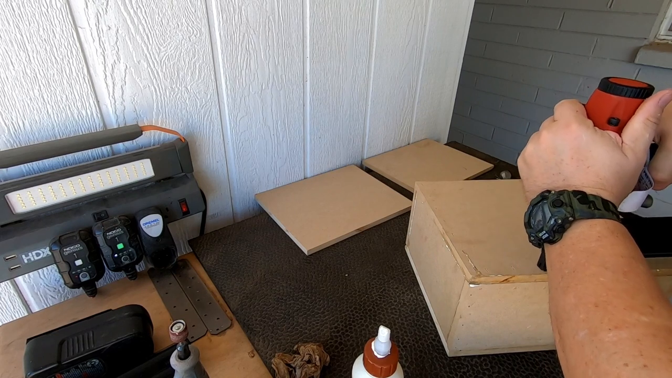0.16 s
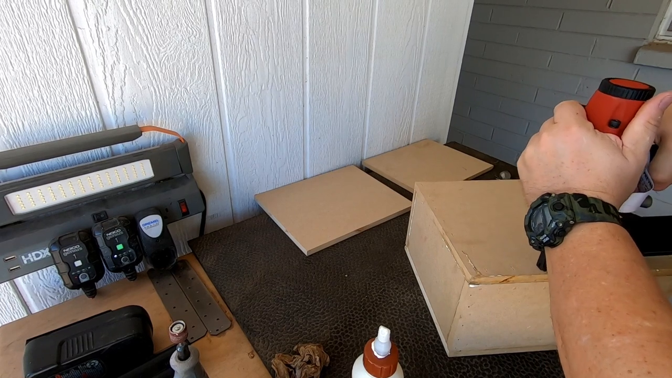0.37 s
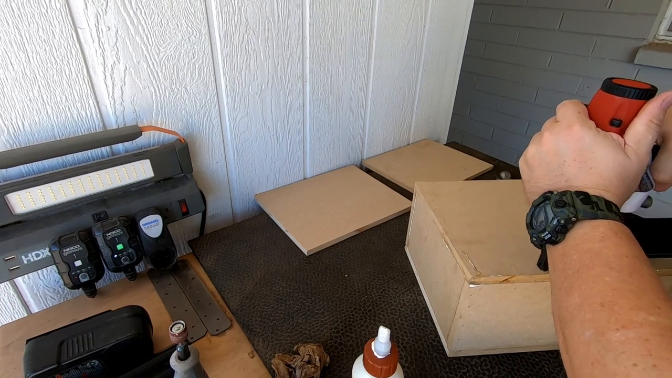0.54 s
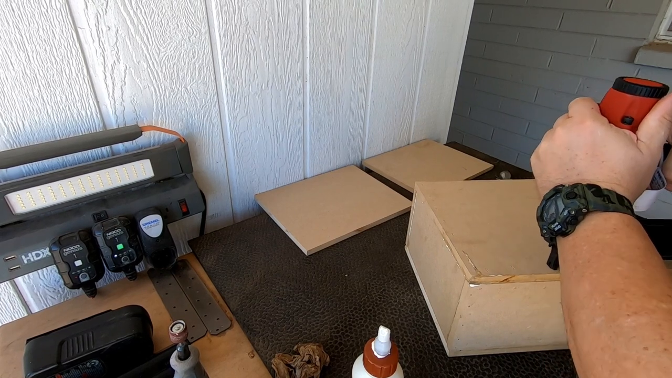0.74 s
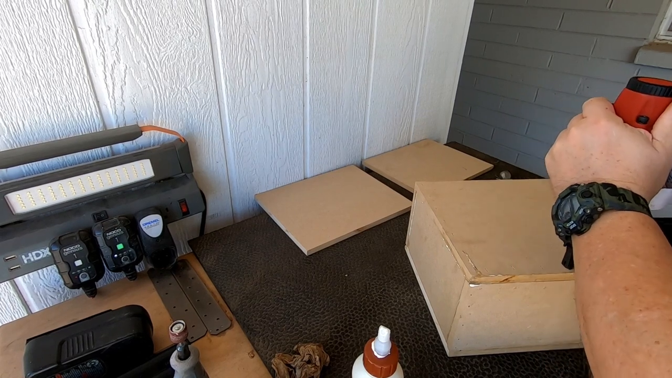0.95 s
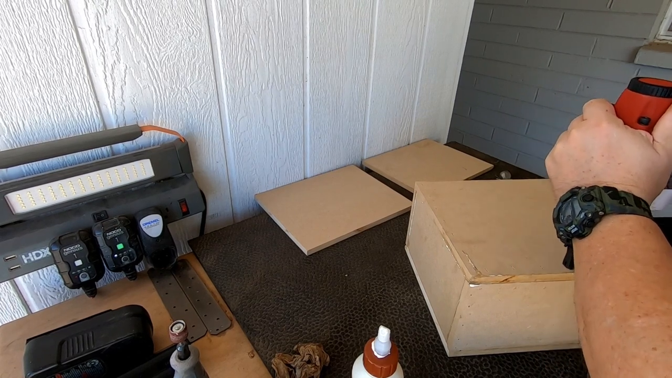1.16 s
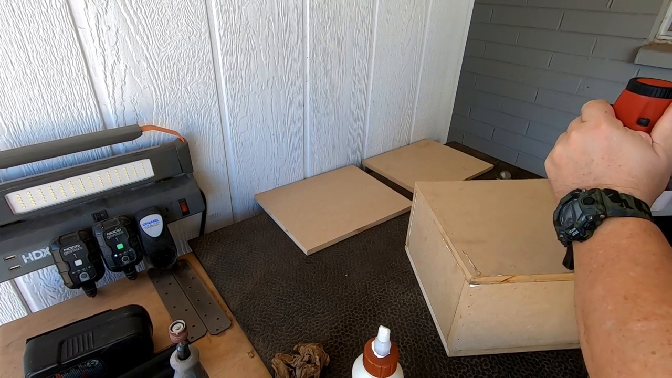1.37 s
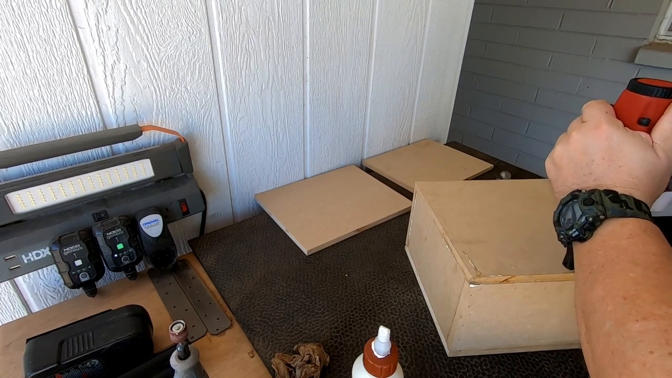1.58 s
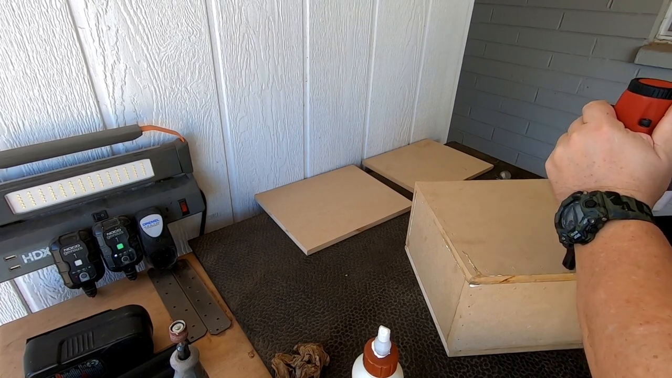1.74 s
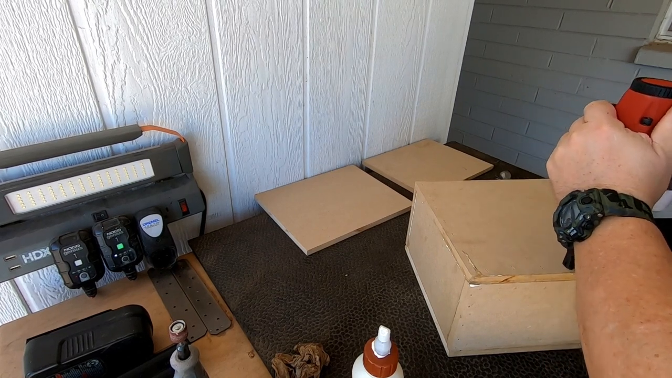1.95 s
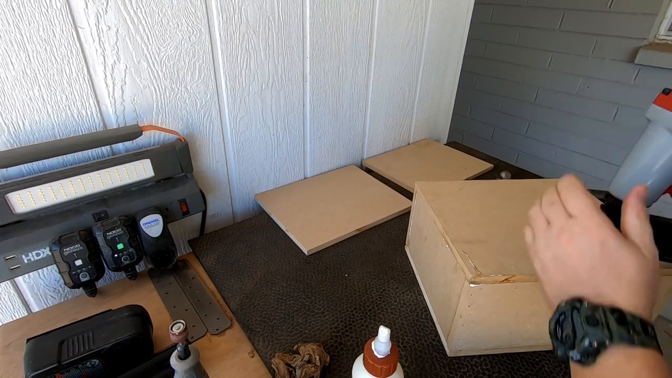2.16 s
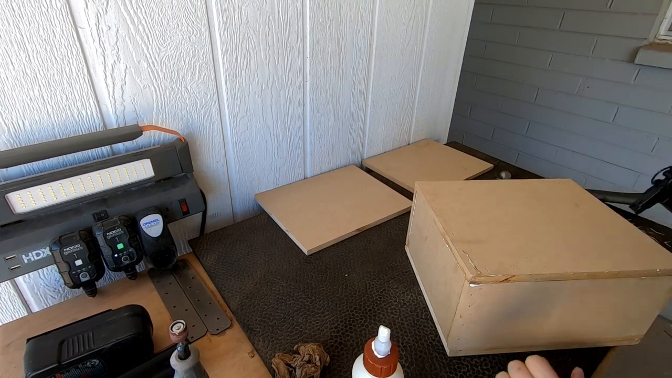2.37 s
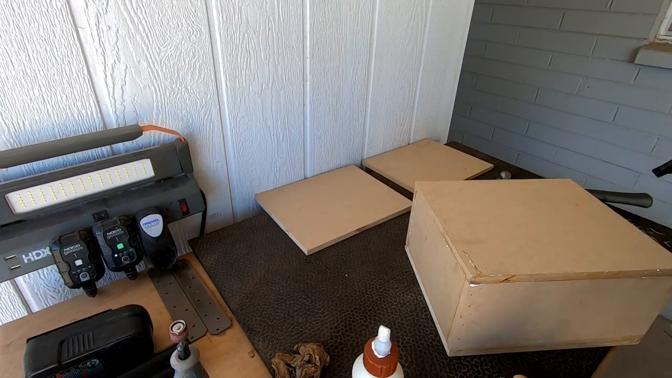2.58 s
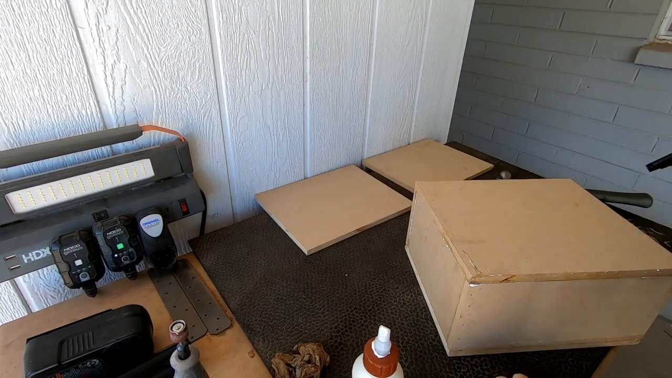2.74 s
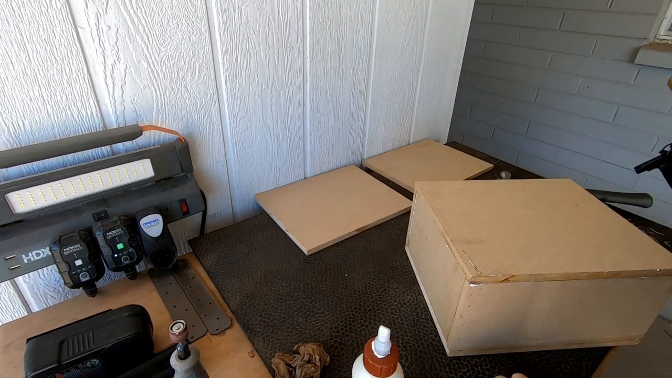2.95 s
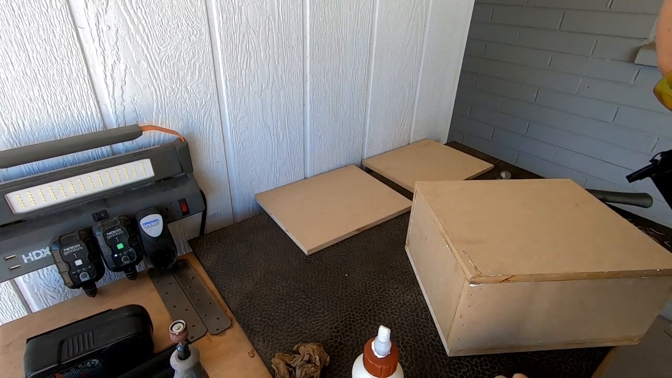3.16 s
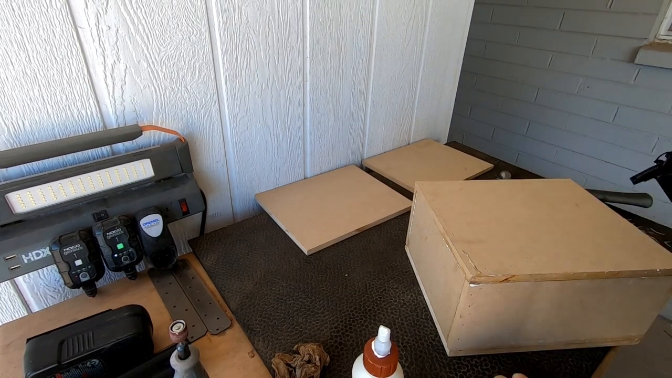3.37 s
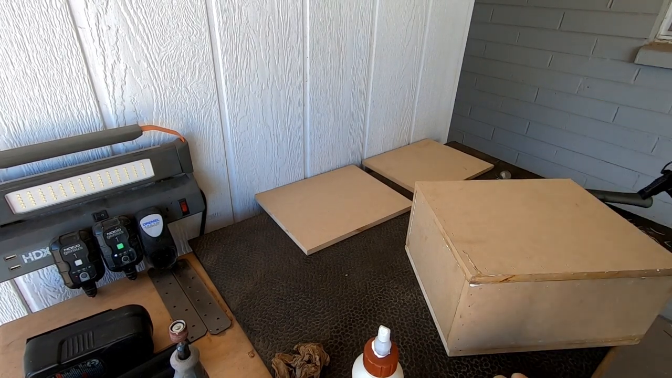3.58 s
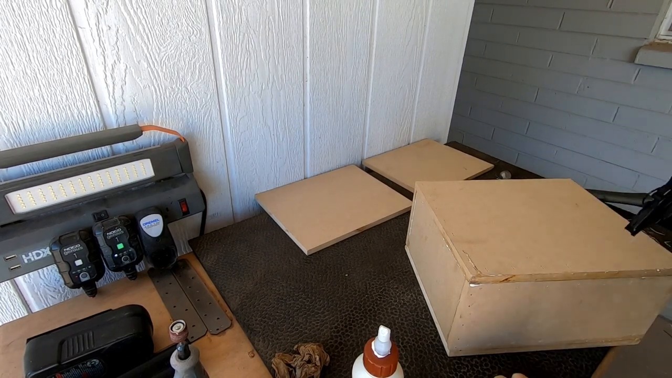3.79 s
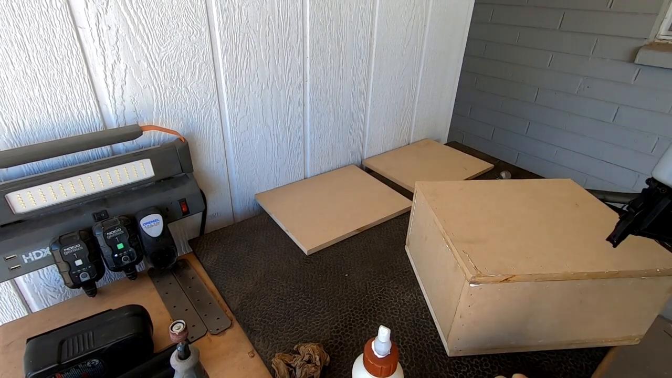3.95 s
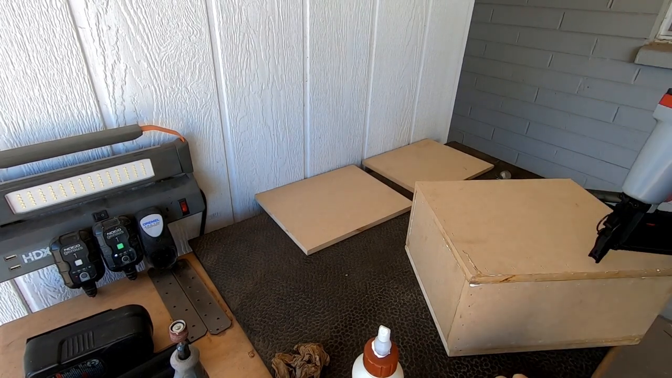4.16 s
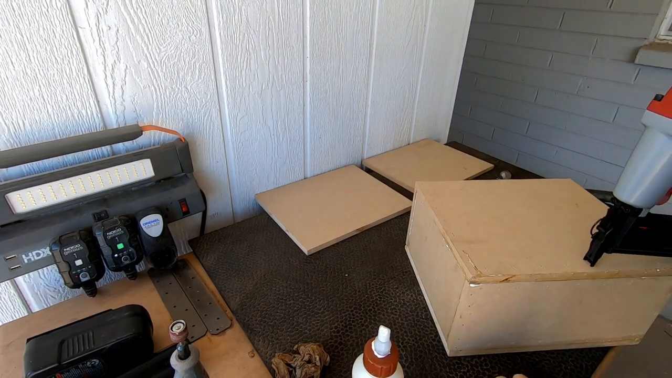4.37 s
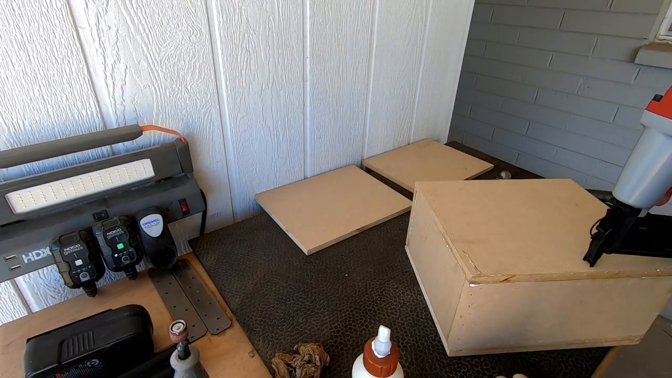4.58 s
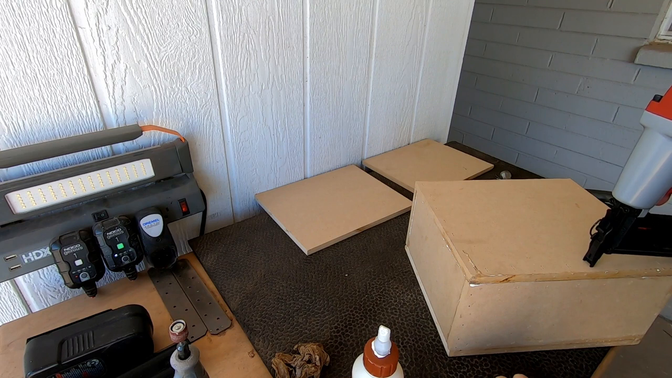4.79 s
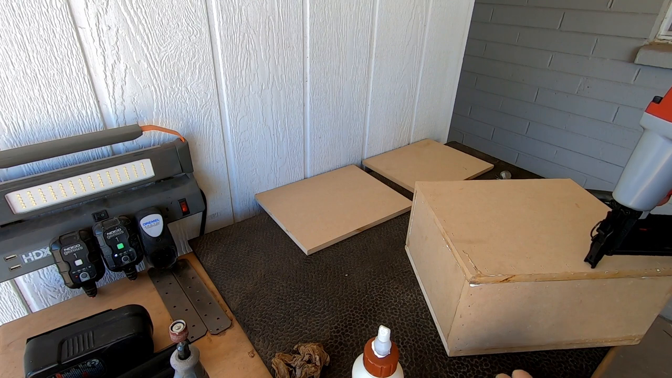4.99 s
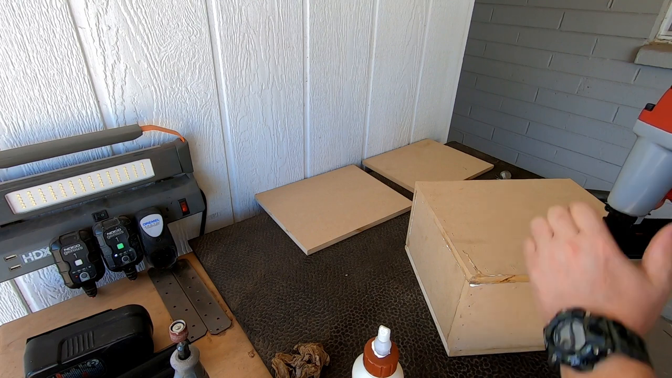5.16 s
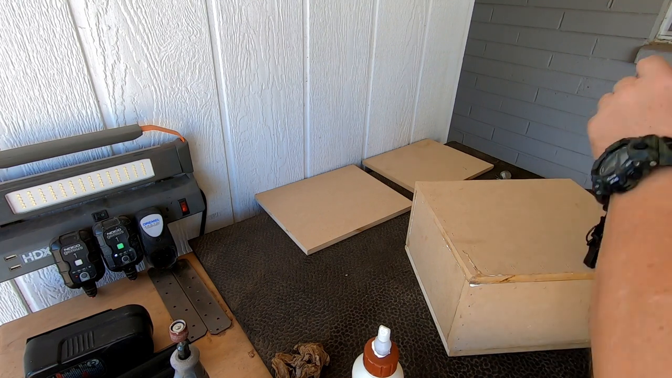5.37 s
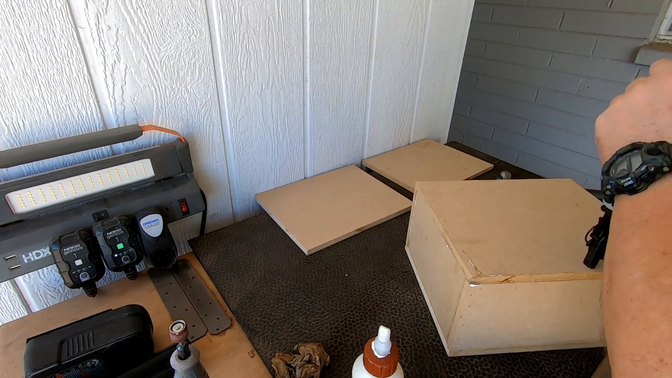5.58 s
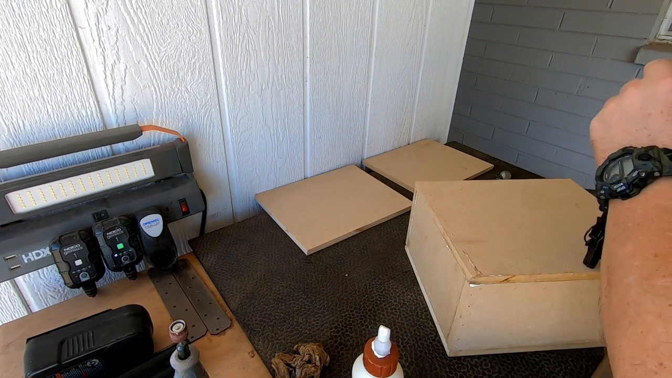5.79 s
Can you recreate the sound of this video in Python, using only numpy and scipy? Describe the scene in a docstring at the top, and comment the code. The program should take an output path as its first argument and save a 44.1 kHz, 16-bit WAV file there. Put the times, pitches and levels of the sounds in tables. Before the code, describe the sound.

Close, slightly clipped sound of a pneumatic nailer driving two nails into a hollow box on a bench. Booming wood, ringing metal and a burst of air come with each shot, echoing off hard walls. The rest is very quiet: a thin seal whistle between shots, a steel click, soft rubbing, small hose chirps, low hiss, then hollow taps and a hose squeal near the end.

```python
"""Air nailer in a small workshop

An air nailer fires twice into a fibreboard box on a workbench, close to the microphone.
Each shot is a valve hiss, the driver's blow and the nail's crack, then an exhaust puff and the piston clacking home.
Shaped noise makes the air and the blows; fading tones make the wood and metal ring.
A seal whistles faintly now and then, and the nose clicks as it lifts off and knocks as it is set down again.
The ribbed air hose zips and squeals along the bench edge as unsteady tones."""
import sys
import numpy as np
from scipy import signal
from scipy.fft import rfft, irfft
from scipy.io import wavfile

SR = 44100
rng = np.random.default_rng(int(sys.argv[2]) if len(sys.argv) > 2 else 0)


def materialize(psi):
    """Save the field psi as 16-bit PCM at rate SR to the path in sys.argv[1].

    A 1-D psi becomes a single channel; in a 2-D psi each row is a channel.
    """
    bounded = np.clip(np.atleast_2d(psi).T, -1, 1)
    quanta = np.round(bounded * 32767).astype(np.int16)
    wavfile.write(sys.argv[1], SR, quanta)


N = 257103
T = np.arange(N) / SR  # time in the whole scene, s
AGE = T[:SR]  # time since one sound began, s


def amp(db):
    """Turn decibels into gain."""
    return 10 ** (np.asarray(db) / 20)


def fade(t60):
    """One second of even dying away, falling 60 dB in t60 seconds."""
    return amp(-60 * AGE / t60)


def add(out, s, sound):
    """Mix a sound in at time s."""
    i = int(s * SR)
    out[i:i + len(sound)] += sound[:N - i]


def colour_gain(f, colour):
    """Gain at each frequency, drawn through a list of (frequency [Hz], level [dB]) points."""
    hz, db = np.transpose(colour)
    return amp(np.interp(np.log(f), np.log(hz), db))


def noise(colour, size=SR):
    """Coloured noise of rms 1: every frequency starts at a random phase, and the deep bass is cut."""
    f = np.fft.rfftfreq(size, 1 / SR) + 1
    lowest_hz = colour[0][0]
    gain = colour_gain(f, colour) * np.minimum(f / lowest_hz, 1) ** 2
    x = irfft(gain * np.exp(2j * np.pi * rng.random(len(f))), size)
    return x / x.std()


def slap(colour):
    """One sharp coloured pulse of peak 1, with its energy packed as early as possible."""
    f = np.fft.rfftfreq(SR, 1 / SR) + 1
    lowest_hz = colour[0][0]
    gain = colour_gain(f, colour) * f / (f + lowest_hz)
    cepstrum = irfft(np.log(gain), SR)
    # keeping only the first half of the cepstrum leaves no sound before the hit
    x = irfft(np.exp(rfft(2 * cepstrum * (AGE < .5))), SR)
    return x / np.abs(x).max()


def wander(rate):
    """Smooth random drift of rms 1 that changes about rate times a second."""
    smoother = signal.butter(2, min(rate, SR / 4), fs=SR, output="sos")
    x = signal.sosfilt(smoother, rng.standard_normal(N))
    return x / x.std()


def mode(hz, t60):
    """One freely ringing resonance: a sine that dies away."""
    return np.sin(2 * np.pi * hz * AGE) * fade(t60)


def ring(modes):
    """Metal resonances ring together; every blow lands a little differently."""
    out = 0
    for hz, db, t60 in modes:
        out = out + amp(db + rng.normal()) * mode(hz * (1 + 0.00023 * rng.normal()), t60)
    return out


def burst(length, rise, t60):
    """A loudness curve that opens, holds until length and then dies away."""
    past_end = np.minimum(length - AGE, 0)
    dying = np.minimum(np.exp(np.log(1000) * past_end / t60), 1)
    return (1 - np.exp(-AGE / rise)) * dying


def swell(s, length, attack, release):
    """A loudness curve that builds up, holds and stops."""
    return np.clip((T - s) / attack, 0, 1) * np.clip((s + length - T) / release, 0, 1)


def tone_phase(pitch, scatter, rate):
    """Phase of a tone that follows its pitch unsteadily."""
    return 2 * np.pi * np.cumsum(pitch * (1 + scatter * wander(rate))) / SR


# walls of the box: (frequency [Hz], level [dB], time to fall 60 dB [s])
BOX_WALLS = [(213, -15, 0.14), (280, -12.5, 0.11), (420, -12, .09), (692, -24.5, .2), (772, -5, .023),
             (1018, -25, 0.32)]


def box():
    """The walls of the box ring briefly; neighbouring resonances swing in opposite directions."""
    return sum((-1) ** k * amp(db) * mode(hz, t60) for k, (hz, db, t60) in enumerate(BOX_WALLS))


PANEL_HZ = 165  # note of the top panel
# lower notes of the room: (frequency [Hz], level [dB], time to fall 60 dB [s])
LOW_ROOM_NOTES = [(112, -19.5, .6), (124.3, -10.5, 0.33)]


def boom(damped_s=.057):
    """The top panel swings evenly until damped; then a lower note of the room rings on."""
    out = np.zeros(N)
    add(out, 0, amp(-3.5) * mode(PANEL_HZ, t60=0.45) * burst(damped_s, rise=0.0076, t60=0.072))
    add(out, damped_s, sum(amp(db) * mode(hz, t60) for hz, db, t60 in LOW_ROOM_NOTES))
    return out[:SR]


def sway(hz=29.3, t60=0.98):
    """The bench rocks slowly under the microphone: a very low note and a rumble."""
    rumble = noise([(22, 7.5), (50, 0.0), (90, -0.5), (300, -68.5)]) * fade(t60)
    return amp(0.5) * mode(hz, t60) + amp(-4.5) * rumble


# each shot: (driver's blow at [s], wait until the piston is home [s], nail's crack level [dB],
# exhaust level [dB], piston level [dB])
SHOTS = [(.3090, .1578, -5, -12, -4), (1.5738, .177, -6.5, -12, -4)]
# tone colours of the driver's blow, the nail's crack and the magazine's rattle: (frequency [Hz], level [dB])
BLOW_COLOUR = [(200, 2), (350, -3), (850, -6), (1500, -9), (3000, -19), (8000, -23.5), (15000, -40)]
CRACK_COLOUR = [(300, -12.5), (1200, -5), (2000, -4), (2750, 3), (3800, -11), (5500, -2), (9000, -21.5),
                (15000, -27)]
RATTLE_COLOUR = [(250, -6.5), (1100, -2), (2100, 2.5), (5500, -4.5), (14000, -33)]
# the nailer's metal housing: (frequency [Hz], level [dB], time to fall 60 dB [s])
HOUSING = [(1640, -21, 0.25), (1614, -25.5, 0.2), (1855, -18, 0.34), (2024, -23, 0.29), (2152, -27.5, 0.33),
           (2593, -24, .3), (3170, -29, 0.17)]


def shots(crack_delay_s=.0069):
    """The driver slams the box, the nail cracks home and the magazine rattles; the recoil rocks the bench."""
    out = np.zeros(N)
    for s, _, crack_db, _, _ in SHOTS:
        blow = amp(-1.5) * slap(BLOW_COLOUR) + amp(-13.5) * noise(BLOW_COLOUR) * fade(0.11)
        add(out, s, amp(0.5) * (blow + box() + boom() + amp(-28.0) * sway()))
        crack = amp(-2) * noise(CRACK_COLOUR) * burst(0.003, rise=0.000092, t60=0.024)
        rattle = amp(-6.5) * noise(RATTLE_COLOUR) * fade(0.15)
        add(out, s + crack_delay_s, amp(crack_db) * (crack + rattle + amp(-18.0) * ring(HOUSING)))
    return out


# tone colour of the piston against its stop: (frequency [Hz], level [dB])
PISTON_COLOUR = [(550, -27), (760, -0.5), (1100, -7.5), (1500, 6.5), (1880, 5), (2170, -7), (2500, 1),
                 (2850, -4), (3400, -14), (12000, -35.5)]
# bounces of the piston: (time after landing [s], level against the piston level [dB])
BOUNCES = [(.0042, -9), (.0085, -4)]


def returns():
    """The piston clacks against its stop and bounces, rings the housing and nudges the box."""
    out = np.zeros(N)
    for s, home, _, _, db in SHOTS:
        landing = s + home
        for late, hit_db in [(0.00017, 0.0016)] + BOUNCES:
            add(out, landing + late, amp(db + hit_db - 4) * noise(PISTON_COLOUR) * fade(0.032))
        tail = amp(-13.5) * noise(PISTON_COLOUR) * fade(0.37)
        add(out, landing, amp(db) * (tail + amp(-15.5) * ring(HOUSING)))
        add(out, landing + 0.011, amp(db - 5.5) * boom() * fade(1.0))
    return out


# tone colour of air hissing through a port: (frequency [Hz], level [dB])
JET_COLOUR = [(400, -19), (1400, -12.5), (2500, -8.5), (4500, -0.5), (8000, 4), (9200, 1.5), (10400, 3.5),
              (12000, -15), (16000, -27.5)]


def jet(length, hiss_db, puff_db, lead):
    """Air hisses through a port as it opens and shoves the microphone with a low puff."""
    out = np.zeros(N)
    opening = 1 / (1 + np.exp((lead - AGE) / 0.0018))  # half open after the lead time
    hiss = noise(JET_COLOUR) * opening * burst(lead + length, rise=0.003, t60=0.011)
    add(out, 0, amp(hiss_db) * hiss)
    wind = noise([(25, -3.5), (100, -0.5), (200, -17.5), (500, -37.0), (4000, -57)]) * fade(0.51)
    puff = amp(-6.5) * wind - mode(47, t60=0.086)
    puff = puff * burst(length, rise=0.0016, t60=0.85)
    add(out, lead, amp(puff_db) * (puff + amp(-20.5) * sway()))
    return out


# the valve opens this long before the blow, and its air holds this long
VALVE_LEAD_S, VALVE_S = .0238, 0.028
# the exhaust opens this long before the piston lands, and its air holds this long
EXHAUST_LEAD_S, EXHAUST_S = .0213, .019
# tone colour of air filling the cylinder: (frequency [Hz], level [dB])
CYLINDER_COLOUR = [(400, -16.5), (830, -0.5), (2000, -33.5)]


def jets(lead=0.013):
    """The valve hisses before each blow, the exhaust before each return of the piston."""
    out = np.zeros(N)
    for s, home, _, exhaust_db, _ in SHOTS:
        valve_at, exhaust_at = s - VALVE_LEAD_S, s + home - EXHAUST_LEAD_S
        add(out, valve_at - lead, jet(VALVE_S, hiss_db=-16, puff_db=-36, lead=lead))
        filling = noise(CYLINDER_COLOUR) * burst(VALVE_LEAD_S, rise=VALVE_S, t60=VALVE_S)
        add(out, valve_at, amp(-19.5) * filling)
        add(out, exhaust_at - lead, jet(EXHAUST_S, exhaust_db, puff_db=-9.5, lead=lead))
    return out


# clicks of the safety tip and trigger: (time [s], level [dB])
CLICKS = [(1.388, -54.5), (1.468, -52.5), (2.2321, -37.5), (2.24, -22), (2.25, -30), (5.1702, -37)]
# tone colour of a click: (frequency [Hz], level [dB])
CLICK_COLOUR = [(332, -18), (636, -28), (880, -5.5), (1380, -15.5), (1570, -5), (1850, -14.5), (2210, -7),
                (2750, -11.5), (3200, -5.5), (5660, -15.5), (8120, -4), (10400, -17.5), (15000, -46)]
# the steel safety tip: (frequency [Hz], level before a 20 dB lift [dB], time to fall 60 dB [s])
SAFETY_TIP = [(1055, -37, .1), (6610, -35, .05), (7945, -35, .08)]


def clicks():
    """Sharp steel clicks of the safety tip and trigger; the nail strip shivers on after each."""
    out = np.zeros(N)
    for s, db in CLICKS:
        snap_and_shiver = noise(CLICK_COLOUR) * (fade(0.063) + amp(-15) * fade(0.15))
        steel = snap_and_shiver + amp(20) * ring(SAFETY_TIP)
        add(out, s, amp(db) * steel * (1 - np.exp(-AGE / 0.0011)))
    return out


# nose and hand on the box: (time [s], rap level [dB], hollow thump level [dB], bench sway level [dB])
KNOCKS = [(4.3982, -28, -38, -46), (4.5, -50, -36, -42), (5.169, -51, -33.5, -63),
          (5.197, -39, -33.5, -39.5), (5.283, -36, -29, -30.5)]
# tone colour of a rap: (frequency [Hz], level [dB])
KNOCK_COLOUR = [(200, -2.5), (400, 9), (650, -6.5), (1000, 4.5), (1900, -3), (2700, -3), (3400, -13),
                (4800, -12.5), (15000, -51.5)]
# gritty scuffs of the nailer on the bench: (time [s], length before dying away [s], level [dB])
SCUFFS = [(2.756, 0.026, -55.5), (2.812, 0.026, -55.5), (4.778, 0.0163, -59), (5.576, 0.014, -53.5)]


def handling(thump_hz=345, thump_t60=0.055):
    """Hollow knocks are noise raps over short wood notes; gritty scuffs are roughened noise."""
    out = np.zeros(N)
    for s, rap_db, thump_db, sway_db in KNOCKS:
        rap = noise(KNOCK_COLOUR) * burst(0.00094, rise=0.0022, t60=0.11)
        thump = mode(thump_hz, thump_t60) - .5 * mode(1.16 * thump_hz, thump_t60)
        thump = thump + amp(-13.5) * mode(PANEL_HZ, t60=0.41)
        add(out, s, amp(rap_db) * rap + amp(thump_db) * thump + amp(sway_db) * sway())
    for s, length, db in SCUFFS:
        roughness = amp(2.0 * wander(250)[:SR])
        grit = roughness * noise([(1500, 5.0), (4000, 6.0), (8000, 3.0), (14000, -20)])
        add(out, s, amp(db) * grit * burst(length, rise=0.4 * length, t60=0.15))
    return out


def ribs(pitch, scatter, soft_hz=2600):
    """Hose ribs tick so fast that they merge into a tone; slow ribs catch harder and add overtones in fits."""
    phase = tone_phase(pitch, scatter, rate=400)
    catch = amp(3 * wander(40)) / (1 + (pitch / soft_hz) ** 8)
    overtones = amp(-13.5) * np.sin(2 * phase) + amp(-12) * np.sin(3 * phase)
    # the hose also touches at a second place, where the ribs pass more slowly
    second_contact = amp(-6) * np.sin(.91 * phase)
    return np.sin(phase) + second_contact + catch * overtones


# one contact of the hard pull speeds up: (time [s], rib rate [Hz], level [dB])
PULL_RISE = [(5.1, 1320, -44), (5.133, 1522, -47), (5.148, 1750, -41.5), (5.185, 1944, -33.5),
             (5.245, 2110, -45)]
# the next contact squeals to a stop: (time [s], rib rate [Hz], level [dB])
PULL_FALL = [(5.186, 2800, -35.5), (5.212, 3098, -29), (5.276, 2930, -39), (5.335, 2864, -37),
             (5.386, 2486, -36), (5.44, 2380, -37), (5.463, 2300, -53)]


def pull(edge_s=0.007):
    """One hard pull: a squeak glides up, a louder squeal sinks and roughens as it slows, and rubber scrapes."""
    out = np.zeros(N)
    scrape = amp(-21) * noise([(300, -1.0), (4500, -12), (7500, -5.0), (13000, -35)], size=N)
    for curve in (PULL_RISE, PULL_FALL):
        s, hz, db = np.transpose(curve)
        pitch = np.interp(T, s, hz)
        slowing = 1 - pitch / np.maximum.accumulate(pitch)  # share of the top speed lost so far
        squeal = ribs(pitch, scatter=.036 + .17 * slowing)
        gain = amp(np.interp(T, s, db)) * swell(s[0], s[-1] - s[0], edge_s, edge_s)
        out += gain * (squeal + scrape)
    return out * amp(2.2 * wander(90))


# hose strokes over the bench edge: (time [s], length [s], first rib rate [Hz], last rib rate [Hz],
# level before easing off [dB])
ZIPS = [(0.045, 0.12, 3325, 4020, -53), (0.149, 0.13, 3920, 3630, -54), (2.016, 0.16, 3800, 3340, -61.5),
        (2.45, 0.162, 3240, 3080, -63), (3.092, 0.18, 3415, 3890, -62), (3.253, 0.13, 3890, 3806, -52),
        (3.369, 0.08, 3800, 3550, -45), (3.433, 0.1, 3140, 3134, -52), (3.889, 0.075, 3580, 3620, -55)]


def hose():
    """Light hose strokes, gliding in pitch with a slight arch, catch, ease off and let go unevenly."""
    out = np.zeros(N)
    for s, length, first_hz, last_hz, db in ZIPS:
        along = np.clip((T - s) / length, 0, 1)
        arch = 1 + 0.025 * np.sin(np.pi * along)
        pitch = (first_hz + (last_hz - first_hz) * along) * arch
        gain = amp(db - 4 * along) * swell(s, length, attack=0.38 * length, release=.03)
        out += gain * ribs(pitch, scatter=0.028)
    return out * amp(2.5 * wander(64))


# the rasp starts here, lasts this long and centres on this pitch; each squeak peaks after SQUEAK_S
RASP_START_S, RASP_S, RASP_HZ, SQUEAK_S = 4.95, .26, 4190, 0.0029


def rasp(count=320, spread_octaves=0.45, last_db=-53, growth_db=9.5):
    """As the hose starts to slip, tiny squeaks crowd into a rasp that grows louder and spreads in pitch."""
    out = np.zeros(N)
    shape = AGE / SQUEAK_S * np.exp(1 - AGE / SQUEAK_S)
    for k in range(count):
        along = (k + rng.random()) / count
        octaves = spread_octaves * np.sqrt(along) * rng.triangular(-2, 0, 2)
        squeak = shape * np.sin(2 * np.pi * RASP_HZ * 2 ** octaves * AGE)
        add(out, RASP_START_S + along * RASP_S, amp(last_db - growth_db * (1 - along)) * squeak)
    return out


# thin whistles of a seal: (time [s], length [s], starting pitch [Hz], fall in pitch [Hz],
# starting level before fluttering [dB], growth [dB per s])
WHISTLES = [(0.719, 0.86, 3503, 219, -60.5, 7), (4.059, .36, 3620, -430, -71, 3),
            (4.36, 0.3, 4845, 314, -54, -72)]


def whistles():
    """A seal whistles thinly, drifting in pitch and fluttering as the air escapes."""
    out = np.zeros(N)
    for s, length, hz, fall_hz, db, growth in WHISTLES:
        age = np.clip(T - s, 0, length)
        phase = tone_phase(hz - fall_hz * np.sqrt(age / length), scatter=.016, rate=350)
        gain = amp(db + growth * age) * swell(s, length, attack=0.0098, release=.05)
        out += gain * (np.sin(phase) + amp(-21) * np.sin(2 * phase))
    return out * amp(2.2 * wander(24) - .5)


# soft rubs and a long low hiss: (time [s], length [s], level [dB], level of the hollow part [dB])
RUBS_AND_HISS = [(0.734, 0.4, -48, -49.5), (2.17, 0.18, -39, -45), (2.607, 0.77, -59.5, -86),
                 (3.091, 3.42, -53.5, -84)]
# tone colours of the soft part and the hollow part: (frequency [Hz], level [dB])
SOFT_COLOUR = [(59, -54), (100, -0.5), (231, -2.5), (570, -17), (1030, -12), (1400, -4), (2630, -15.5),
               (3610, -20), (6300, -27), (15000, -59)]
HOLLOW_COLOUR = [(220, -15), (340, 6.5), (480, -4.5), (700, -14), (14000, -76)]


def rubs_and_hiss():
    """Soft rubs, some with a hollow part, then a long low hiss that swells and sinks; all are shaped noise."""
    out = np.zeros(N)
    soft, hollow = noise(SOFT_COLOUR, size=N), noise(HOLLOW_COLOUR, size=N)
    for s, length, soft_db, hollow_db in RUBS_AND_HISS:
        loudness = swell(s, length, attack=0.2, release=0.4)
        out += loudness * (amp(soft_db) * soft + amp(hollow_db) * hollow)
    return out * amp(0.093 * wander(14.0))


# tone colour of the shop air: (frequency [Hz], level [dB])
SHOP_COLOUR = [(25, 1), (69, 8), (135, -15), (163, 0.5), (278, -8.5), (438, -18.5), (1100, -17),
               (1810, -10), (2430, -17), (3830, -19), (4260, -27), (8320, -25), (15000, -63.5)]


def background():
    """Nearly steady shop air, and a fine hiss while the nailer swings back to the box."""
    hiss = noise([(4000, -3.5), (10000, 0.0), (15000, -28.0)], size=N)
    swing = amp(-62.0) * np.exp(-((T - 3.75) / 0.43) ** 2) * hiss
    return amp(-57.5 + 0.79 * wander(3.2)) * noise(SHOP_COLOUR, size=N) + swing


# echoes of the workshop: (frequency [Hz], time to fall 60 dB [s], level [dB])
ROOM = [(148, 0.7, -19), (510, 0.27, -6), (750, 0.51, -4.5), (2020, 0.52, -0.5), (3840, 0.67, -4.5),
        (7900, 0.36, -1.5), (15000, 0.25, -16.5)]


def room(x, first_echo=0.0078):
    """Diffuse echoes from hard walls: fading noise in which every band has its own decay and strength."""
    hz, t60, db = np.transpose(ROOM)
    f = np.fft.rfftfreq(SR, 1 / SR) + 1
    white, response = rfft(rng.standard_normal(SR)), 0
    for k, share in enumerate(np.eye(len(hz))):
        band = irfft(white * np.interp(np.log(f), np.log(hz), share), SR)
        decay = fade(t60[k])
        response = response + amp(db[k]) * band * decay / np.linalg.norm(decay)
    build_up = 1 - np.exp(-(AGE / first_echo) ** 2)
    return signal.fftconvolve(x, response * build_up)[:N]


def scene():
    """The nailer is close; the exhaust and piston are drier than the blows, and the far hose sounds wetter."""
    blows, piston, air, steel = shots(), returns(), jets(), clicks()
    small = handling() + pull()
    far = hose() + rasp() + whistles()
    to_room = amp(-3.5) * blows + amp(-7.5) * piston + amp(-7.5) * air
    to_room = to_room + amp(-12.0) * steel + amp(-1.0) * small + amp(4.0) * far
    close = blows + piston + air + steel + small + far
    return (close + room(to_room) + rubs_and_hiss() + background())[None]


def record(dry, notch_hz=9200, notch_q=9, notch_share=0.44, top_hz=15500):
    """The blows overload the recorder; the microphone port hollows the treble, and the top is cut."""
    notched = signal.lfilter(*signal.iirnotch(notch_hz, notch_q, fs=SR), dry)
    heard = dry + notch_share * (notched - dry)
    overloaded = np.clip(heard, -1, 1)
    return signal.sosfilt(signal.ellip(8, .2, 70, top_hz, fs=SR, output="sos"), overloaded)


dry = scene()
out = record(dry)
materialize(out)
```